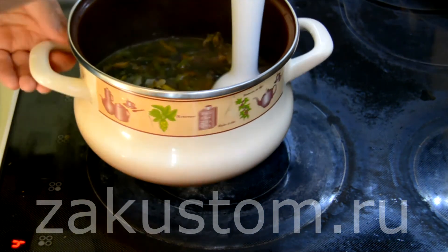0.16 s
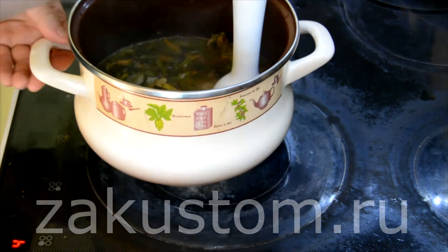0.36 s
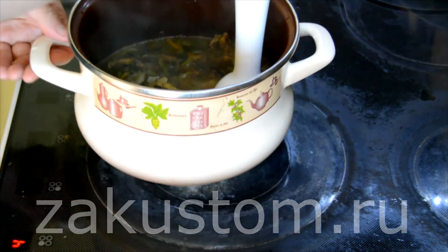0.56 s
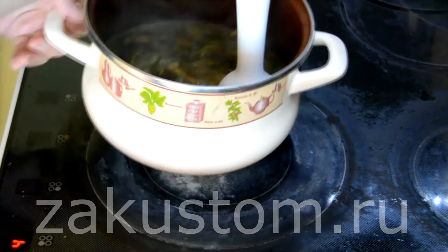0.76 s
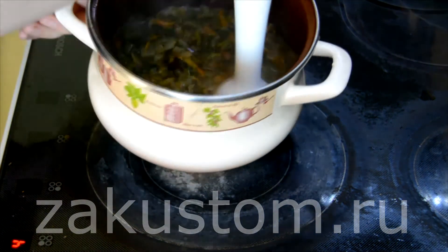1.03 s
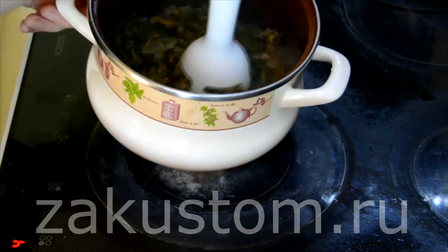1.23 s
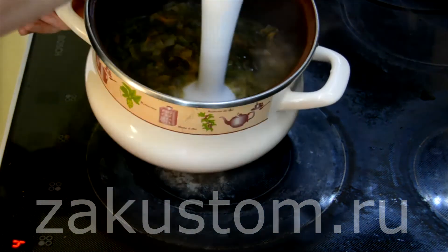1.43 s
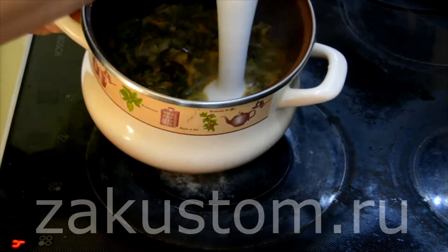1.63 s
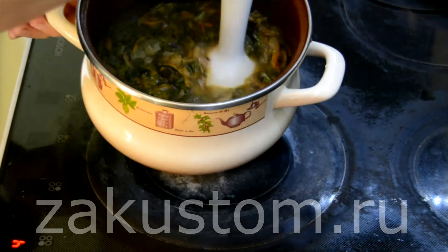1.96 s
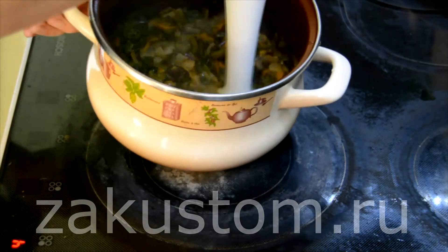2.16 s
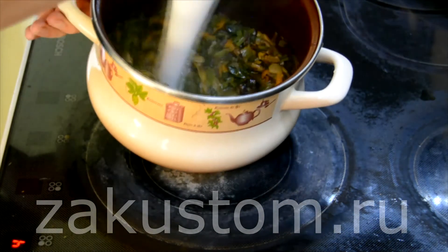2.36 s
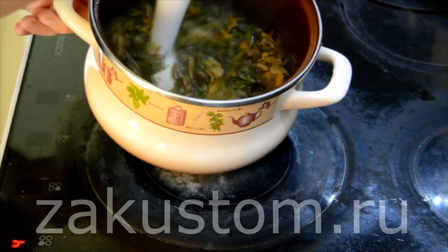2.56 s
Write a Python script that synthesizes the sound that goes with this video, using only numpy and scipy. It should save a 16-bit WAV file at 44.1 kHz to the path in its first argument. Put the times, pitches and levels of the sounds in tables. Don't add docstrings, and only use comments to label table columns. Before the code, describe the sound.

A handheld blender purees soup in an enamel pan, heard close in a small, lightly echoing kitchen. Quiet room air, a dull metallic knock at 0.15 s, then a squeaky start at 0.2 s. The motor races up, sags from 0.6 to 0.8 s, and revs again into a steady, rough whine with hissing churn. Around 1.25 s it rises, brighter and ringing; lumps crunch strongly near 1.67 and 2.19 s, with low pan thuds, running to the end.

```python
import sys
import numpy as np
from scipy import signal
from scipy.fft import rfft, irfft, next_fast_len
from scipy.io import wavfile
from scipy.ndimage import map_coordinates

SR = 44100
rng = np.random.default_rng(int(sys.argv[2]) if len(sys.argv) > 2 else 0)


def bounce(signal):
    frames = np.transpose(np.atleast_2d(signal))
    limited = np.clip(frames, -1, 1)
    pcm = np.round(limited * 32767).astype(np.int16)
    wavfile.write(sys.argv[1], SR, pcm)


def invert_db(x):
    u = np.asarray(x, float) / 20
    return 10 ** u


N = 119070
START_S = 0.208


def unit(x):
    return x / np.sqrt(np.mean(x ** 2) + 1e-20)


def along(points, hz):
    f, v = np.transpose(points)
    return np.interp(np.log(hz + 1), np.log(f + 1), v)


def wobble(knots_per_s):
    return map_coordinates(rng.standard_normal(200), [np.arange(N) * knots_per_s / SR])


def filtered(x, response):
    m = next_fast_len(N + SR // 2)
    return irfft(rfft(x, m) * response(np.fft.rfftfreq(m, 1 / SR)), m)[..., :N]


def noise(spectrum):
    return unit(filtered(rng.standard_normal(N), lambda hz: invert_db(along(spectrum, hz))))


# freq_hz, density_db_per_hz
ROOM_TONE = [(24, -68), (40, -73), (82, -2), (142, -31), (182, -8), (233, -4.5), (1260, 4.5), (1530, -4.5),
             (15000, -34.5)]


def kitchen_air():
    level_db = -46.5 + 1.4 * wobble(28.5)
    return invert_db(level_db) * np.array([noise(ROOM_TONE), noise(ROOM_TONE)])


# freq_hz, t60_s
WALL_DECAY = [(200, 0.58), (2000, 0.35), (10000, 0.23)]


def walls(x):
    hz, t, z = signal.stft(rng.standard_normal((2, SR // 2)), SR, nperseg=256)
    decay_db = -60 * t / along(WALL_DECAY, hz)[:, None]
    tail = signal.istft(z * invert_db(decay_db), SR, nperseg=256)[1]
    tail = tail / np.linalg.norm(tail[0])
    delayed = np.pad(x, (300, 0))[None]
    return signal.fftconvolve(delayed, tail, axes=1)[:, :N]


# start_s, peak_db
PAN_KNOCK = [
    (0.145, -20),
]
# freq_hz, level_db, t60_s
PAN_MODES = [(205, -18, 0.11), (391, 8.5, 0.09), (543, 4, 0.075), (694, 7.5, 0.084), (770, -16, 0.069),
             (1120, -3, .08)]
# freq_hz, density_db_per_hz
RATTLE_SPECTRUM = [(100, -17), (500, 2), (2000, -2), (3600, -11), (5000, -23), (12000, -49.5)]


def knock():
    x, t = np.zeros(N), np.arange(SR // 2) / SR
    for start_s, peak_db in PAN_KNOCK:
        ring = sum(invert_db(level_db - 60 * t / t60_s) * np.sin(2 * np.pi * hz * t)
                   for hz, level_db, t60_s in PAN_MODES)
        crack_noise = noise([(300, -19), (1500, 12), (7000, -16), (12000, -46)])[:len(t)]
        crack = 3.7 * invert_db(-60 * t / 0.0063) * crack_noise
        rattle = 1.84 * invert_db(-60 * t / 0.1) * noise(RATTLE_SPECTRUM)[:len(t)]
        x[round(start_s * SR):][:len(t)] += invert_db(peak_db - 12.5) * (ring + crack + rattle)
    return x


# peak_s, level_db
PAN_SHIFTS = [(.45, -64), (1.25, -56), (1.31, -53), (1.47, -52), (1.62, -52), (1.67, -56), (2.19, -56),
              (2.32, -52), (2.54, -58)]


def pan_thuds():
    t = np.arange(N) / SR
    width_s = 0.0069
    gain = sum(invert_db(db - (np.abs(t - s) / width_s) ** 2) for s, db in PAN_SHIFTS)
    return gain * noise([(20, -13), (90, -5), (160, -1), (300, -33), (600, -90)])


# peak_s, level_db
LUMP_HITS = [(0.211, -31), (0.27, -22), (.296, -21), (0.498, -25), (.555, -17), (.9, -16), (1.38, -15),
             (1.531, -20), (1.665, -12.5), (1.86, -28), (2.12, -18), (2.188, -11.5), (2.38, -18),
             (2.48, -17), (2.56, -27), (2.67, -18)]
# freq_hz, density_db_per_hz
LUMP_SPECTRUM = [(40, -45), (150, -49), (400, -5), (1100, 10), (2000, 3), (4000, 0.5), (9000, -19),
                 (15000, -47)]


def lumps():
    t = np.arange(N) / SR
    rise_60db_s, t60_s = 0.03, 0.095
    gain = sum(invert_db(db - 60 * np.abs(t - s) / np.where(t > s, t60_s, rise_60db_s))
               for s, db in LUMP_HITS)
    return gain * noise(LUMP_SPECTRUM)


def scrape():
    start_hz, rise_hz_per_s, hold_s, level_db = 1743, 29000, 0.024, -32
    u = np.maximum(np.arange(N) / SR - START_S, 0)
    phase = 2 * np.pi * (start_hz * u + rise_hz_per_s * u ** 2 / 2)
    rough = noise([(20, 14), (250, -6), (500, -33), (1000, -90)])
    fade_db = -12 * np.maximum(u / hold_s - 1, 0) ** 2 * 9
    squeak = (u > 0) * invert_db(fade_db) * rough * np.sin(phase)
    tick_noise = noise([(4000, -75), (10000, -5), (13500, -4), (16000, -30)])
    tick = 1.2 * invert_db(-((u - 0.017) / 0.0028) ** 2) * tick_noise
    return invert_db(level_db) * (squeak + invert_db(-15) * tick)


# freq_hz, density_db_per_hz
SLOSH_SPECTRUM = [(15, -35), (30, -18), (90, -13), (170, 7), (300, -3), (600, -60)]


def soup_slosh(gain):
    level_db = -39.5 + 1.5 * wobble(15)
    return gain * invert_db(level_db) * np.array([noise(SLOSH_SPECTRUM), noise(SLOSH_SPECTRUM)])


# freq_hz, density_db_per_hz
BRUSH_SPECTRUM = [(2000, -36), (6000, 0.5), (10400, -2.5), (13000, -15.5), (15000, -22), (16000, -50)]


def brush_sparks(effort_db, out_db):
    t = np.arange(N) / SR
    effort_swing, warm_db_per_s, out_brightens = 0.94, 2.6, 0.47
    level_db = -41 + effort_swing * (effort_db - effort_db[-1]) + warm_db_per_s * t
    level_db = level_db + out_brightens * out_db + 0.97 * wobble(34.7)
    return (t > START_S) * invert_db(level_db) * noise(BRUSH_SPECTRUM)


# freq_hz, width_hz, lift_db
HOUSING_MODES = [(370, 98, 9.5), (434, 50, -7.5), (601, 81, 11), (702, 83, 5.5), (1150, 240, 5.5),
                 (1410, 41, 5), (1700, 300, 1), (1912, 23, 5), (2434, 47, 4)]


def humps_db(hz):
    strong_mode = (915, 55, 15)
    return sum(db / (1 + (2 * (hz - c) / w) ** 2) for c, w, db in HOUSING_MODES + [strong_mode])


# freq_hz, density_db_per_hz
CHURN_SPECTRUM = [(200, -52), (400, -21), (800, -14), (1300, -3.5), (4600, -6.5), (6500, -16),
                  (10400, -31.5), (15500, -55)]


def soup_churn(turn, slow):
    vent_hz, vent_width_hz, vent_db = 4580, 160, 7
    dull_hz, dull_db_per_oct = 2800, 7.5
    grain_db, surge_db = 1.3, 0.8

    def body(f):
        vent_lift_db = vent_db / (1 + (2 * (f - vent_hz) / vent_width_hz) ** 2)
        return invert_db(0.48 * humps_db(f) + vent_lift_db)

    churn = filtered(noise(CHURN_SPECTRUM), body)
    beat = 1 + 0.25 * np.cos(turn) + 0.05 * np.cos(2 * turn)
    churn = unit(churn * beat * invert_db(grain_db * wobble(40.12) + surge_db * wobble(16)))
    treble = filtered(churn, lambda f: 1 / (1 + (dull_hz / (f + 1)) ** 4))
    return churn - treble * (1 - invert_db(-dull_db_per_oct * slow))


# multiple, level_db
SHAFT_ORDERS = [(1, -14.5), (2, -2), (3, -0.5), (4, -1), (5, -3), (6, -1.5), (7, -5), (8, 0.5), (9, -1.5),
                (10, -2.5), (11, -15.5), (12, -4.5), (13, -21.5), (14, -3), (15, -7.5), (16, -4),
                (17, -4.5), (18, -18), (19, -7.5), (20, -15)]


def shaft_whine(hz, turn, slow, out_db):
    bell_hz, bell_width_hz = 1920, 860
    shake_db_per_root_oct = 13
    whine = np.zeros(N)
    for k, order_db in SHAFT_ORDERS:
        bell_db = out_db / (1 + ((k * hz - bell_hz) / bell_width_hz) ** 2)
        flutter_db = (1.48 + 0.12 * k) * wobble(18)
        shake_db = shake_db_per_root_oct * np.sqrt(slow) * np.abs(wobble(21.905))
        level_db = order_db + humps_db(k * hz) + bell_db + flutter_db - shake_db
        jitter_rad = (0.062 * k + 0.0025 * k * k + 2.6 * slow) * wobble(45)
        whine += invert_db(level_db) * np.sin(k * turn + rng.uniform(0, 2 * np.pi) + jitter_rad)
    return whine


# time_s, shaft_hz, effort_db, whine_over_effort_db
MOTOR_RUN = [(.2, 93.9, -32.5, 12), (.3, 184.7, -19, -1.5), (0.351, 211, -15, -5), (.43, 224.3, -18, -6),
             (0.519, 234.2, -17, -5), (.57, 224.5, -18, -5), (0.659, 157.4, -23, 5.5),
             (.73, 127.7, -30.5, 5), (.81, 105.4, -31.5, 10), (.87, 186.1, -22, 0), (.92, 210.8, -18, -6),
             (1.0, 224.4, -18, -7), (1.161, 238.7, -18, -4.5), (1.33, 252.6, -16, -4),
             (1.46, 236.9, -18.5, -6), (1.621, 239.3, -19, -3.5), (2.0, 242.8, -18.5, -5.5),
             (2.7, 245, -19, -2.5)]
# time_s, lift_db
CUP_OUT = [
    (1.1, 1.5),
    (1.24, 8.5),
    (1.32, 9.5),
    (1.37, 3),
]
# time_s, lost_hz
SHAFT_DRAG = [
    (1.665, 4.028),
    (2.19, 5.005),
]


def blender():
    t = np.arange(N) / SR
    regain_s, choke_db, choke_s = 0.12, 4, 0.022
    full_hz, grow_db_per_oct, out_quiets = 240, 25, 0.55
    time_s, *columns = np.transpose(MOTOR_RUN)
    hz, effort_db, whine_db = [np.interp(t, time_s, c) for c in columns]
    hz = hz - sum(lost_hz * (t > s) * np.exp(-np.abs(t - s) / regain_s) for s, lost_hz in SHAFT_DRAG)
    out_db = np.interp(t, *np.transpose(CUP_OUT))
    turn = 2 * np.pi * np.cumsum(hz * (1 + 0.00198 * wobble(25.14))) / SR
    slow = np.abs(np.log2(full_hz / hz))
    choked_db = sum(choke_db * np.exp(-((t - s) / choke_s) ** 2) for s, _ in SHAFT_DRAG)
    whine_db = whine_db - grow_db_per_oct * slow - choked_db
    gain = (t > START_S) * invert_db(effort_db)
    whine = gain * invert_db(whine_db - 6) * shaft_whine(hz, turn, slow, out_db)
    churn = gain * invert_db(-0.5 - out_quiets * out_db) * soup_churn(turn, slow)
    return whine, churn + brush_sparks(effort_db, out_db), soup_slosh(gain)


# freq_hz, side_over_mid_db
SIDE_SPECTRUM = [(60, -21), (110, -18), (200, -22), (380, -27), (700, -34), (1290, -25), (2380, -22),
                 (4400, -16), (8120, -7.5), (15000, -4.5)]


def scene():
    whine, churn, slosh = blender()
    rest = churn + lumps() + pan_thuds() + knock() + scrape()
    air = kitchen_air()
    wet, other = walls(rest + invert_db(-3.5) * whine)
    mid = invert_db(-1.09) * (rest + whine + invert_db(-6) * wet) + air[0] + slosh[0]
    late_whine = np.roll(whine, SR // 100)
    side = other + 1.04 * late_whine + air[1] + 1.6 * slosh[1]
    side = filtered(side, lambda hz: invert_db(along(SIDE_SPECTRUM, hz))) - 0.027 * mid
    return np.array([mid + side, mid - side])


def roll_off(x):
    return signal.sosfilt(signal.butter(12, 15630, fs=SR, output="sos"), x)


def record(dry):
    cut_hz, ceiling, knee = 95, 0.47, 6
    x = filtered(dry, lambda hz: 1j * hz / (cut_hz + 1j * hz))
    mix = x / (1 + np.abs(x / ceiling) ** knee) ** (1 / knee)
    return roll_off(mix)


dry = scene()
out = record(dry)
bounce(out)
```